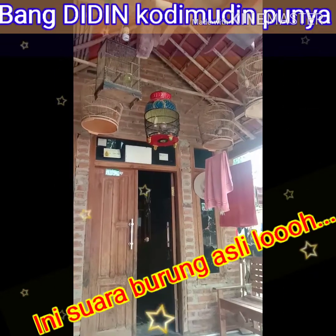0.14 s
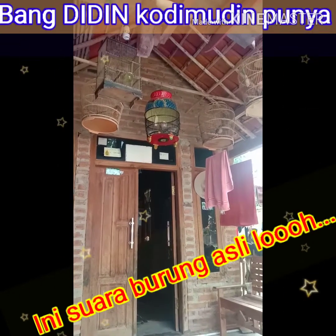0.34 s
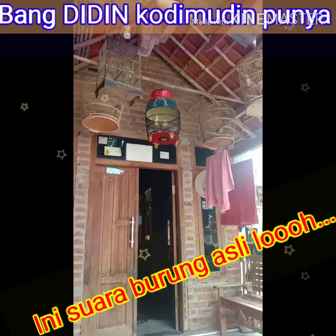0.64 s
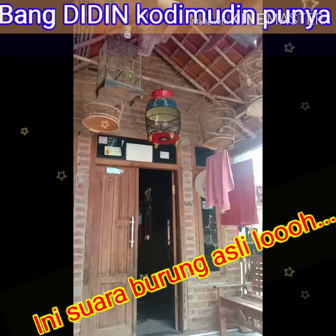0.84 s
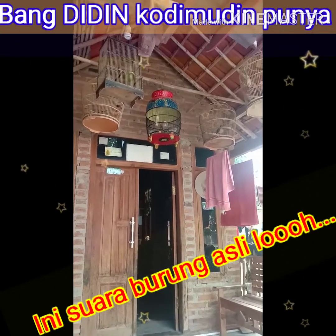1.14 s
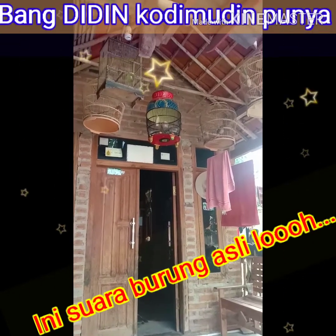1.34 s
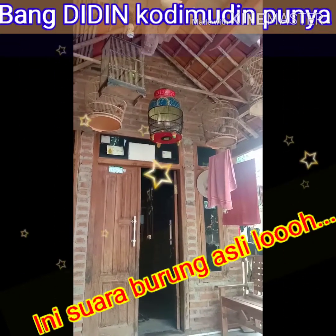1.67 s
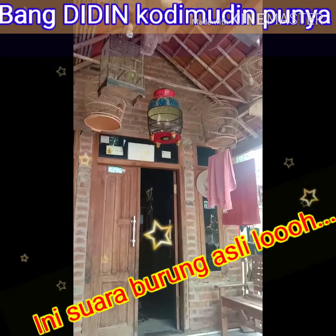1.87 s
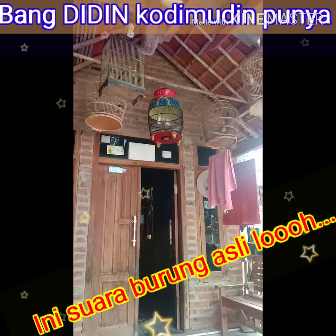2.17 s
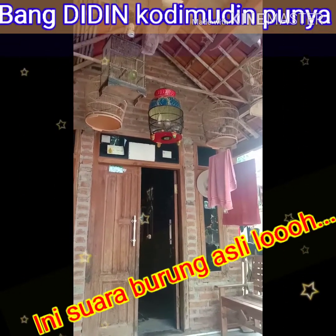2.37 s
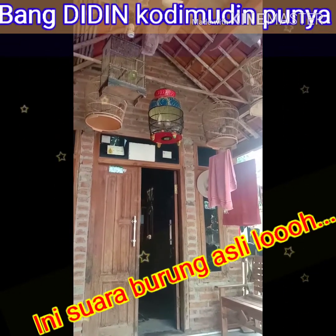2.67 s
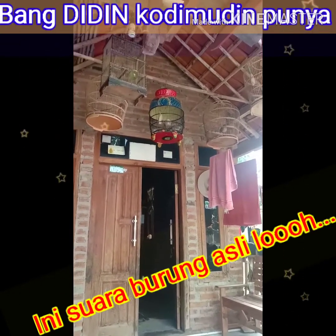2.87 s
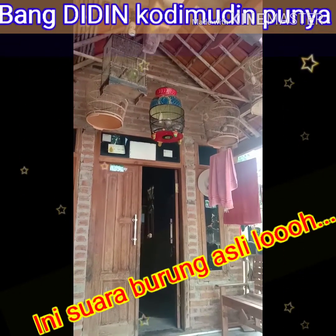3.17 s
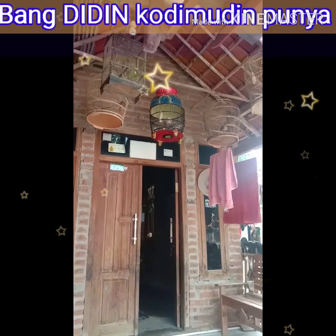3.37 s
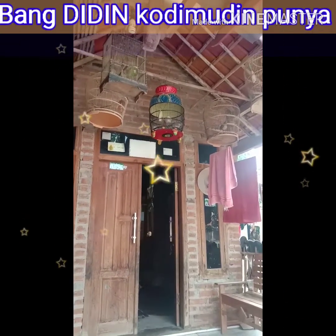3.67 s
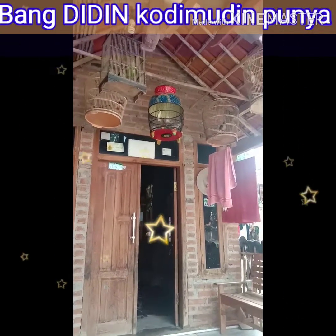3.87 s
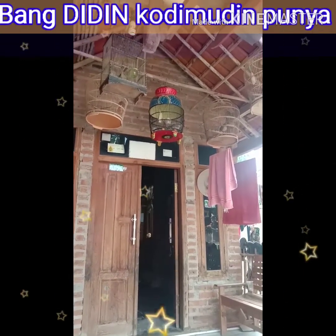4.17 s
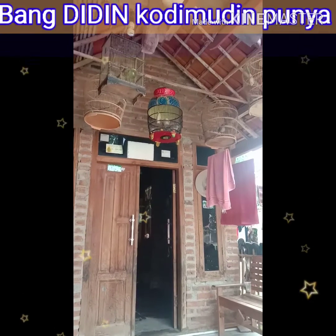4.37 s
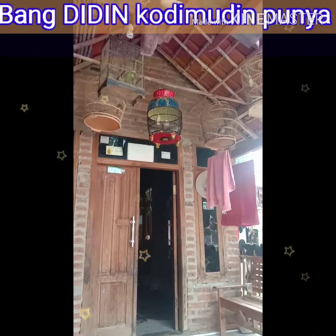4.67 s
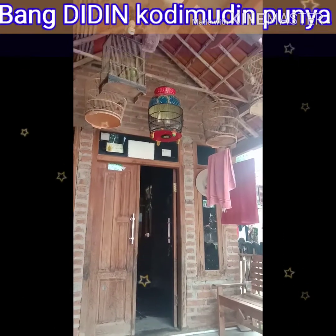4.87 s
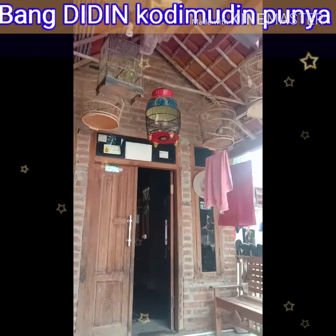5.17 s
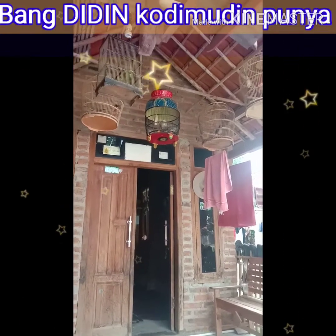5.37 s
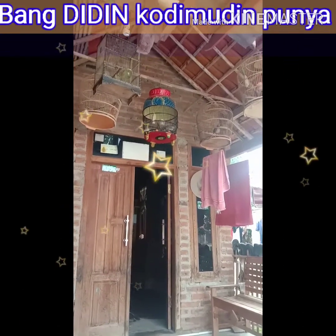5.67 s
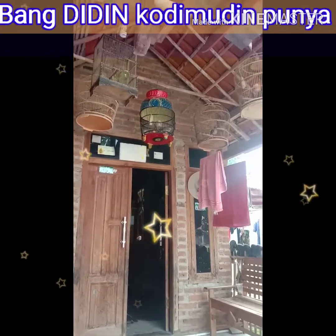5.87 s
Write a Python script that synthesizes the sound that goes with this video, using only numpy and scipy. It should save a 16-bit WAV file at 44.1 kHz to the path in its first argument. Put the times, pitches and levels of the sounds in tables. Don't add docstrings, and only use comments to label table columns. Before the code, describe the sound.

On a hard-walled house porch, one dove dominates with three clear, flute-like calls of long, short, short, short, longer, long notes. A second dove replies softly and reverberantly after the first call. Small birds twitter far off, hens cluck quietly, and a broom brushes the ground around three seconds and twice near the second half's middle. Distant traffic swells gently beneath light open-air noise and faint motor hum.

```python
import sys
import numpy as np
from scipy import signal
from scipy.fft import rfft, irfft, next_fast_len
from scipy.io import wavfile
from scipy.ndimage import uniform_filter1d

SR = 44100
rng = np.random.default_rng(int(sys.argv[2]) if len(sys.argv) > 2 else 0)


def inscribe(sig):
    pcm = np.round(np.clip(np.atleast_2d(sig).T, -1, 1) * 32767)
    wavfile.write(sys.argv[1], SR, pcm.astype(np.int16))


def rack_gain(trim_db):
    fader = np.asarray(trim_db, float)
    return 10 ** (fader / 20)


N = 265909
LEAD = SR // 2

# length_s, start_hz, top_hz, end_hz, level_db
CALL_NOTES = [
    (0.1150, 700.0, 1252.0, 1220.0, -18.1),
    (0.0276, 1046.0, 1235.0, 1223.0, -16.0),
    (0.0291, 988.0, 1229.0, 1217.0, -17.8),
    (0.0322, 721.0, 1238.0, 1158.0, -20.2),
    (0.0408, 635.0, 1274.0, 1229.0, -18.7),
    (0.1162, 709.0, 1293.0, 1194.0, -16.8),
]
NOTE_ONSETS = (0, .1177, .1586, .2172, .3001, .4008)
# first_note_s, rhythm_stretch
CALLS = [
    (-.1825, 1.018),
    (2.4186, 1.0),
    (5.1073, 1.0185),
]
# multiple, level_db (re tone)
OVERTONES = [(2, -56), (3, -65), (4, -67), (5, -52), (6, -69.5), (7, -68.5)]
# start_s, length_s, start_hz, top_hz, level_db
ANSWER_OPENING = [
    (1.031, 0.024, 1270, 1300, -52.5),
    (1.056, 0.053, 875, 1098, -46.5),
    (1.093, .105, 1260, 1263, -33),
]
# start_s, length_s, top_hz, level_db
ANSWER_RUN = [
    (1.212, 0.032, 1192, -46.5),
    (1.274, 0.044, 1210, -46),
    (1.326, 0.04, 1088, -51.5),
    (1.402, 0.029, 1214, -43),
    (1.481, 0.028, 1280, -39.5),
    (1.561, .032, 1285, -41),
    (1.66, .045, 1257, -39.5),
    (1.797, .075, 1228, -42.5),
    (1.883, 0.022, 1236, -46.5),
]
# start_s, length_s, start_hz, level_db
SPARROWS = [
    (.48, .09, 4800, -64.5),
    (1.52, .07, 4790, -67.5),
    (2.04, .07, 5280, -70),
    (2.77, 0.051, 4340, -51.5),
    (4.14, .07, 5000, -67),
    (4.70, .05, 5140, -68.5),
    (5.69, .08, 5400, -72.5),
]
# start_s, length_s, start_hz, level_db
FINCHES = [(.08, 0.075, 3006, -69), (.125, 0.045, 3780, -64.5), (.545, 0.061, 3190, -68),
           (.99, .09, 3160, -69), (1.00, 0.074, 3780, -73), (1.68, 0.093, 2157, -66),
           (1.74, 0.14, 2600, -61.5), (1.86, 0.15, 2500, -64.5), (1.75, .2, 3100, -66.5),
           (1.86, 0.066, 3830, -68.5), (2.27, 0.12, 3140, -65), (2.27, 0.11, 3760, -71.5),
           (3.0, 0.17, 3476, -61), (3.16, .2, 3740, -64), (3.235, 0.042, 7580, -65.5),
           (3.13, 0.15, 7780, -74.5), (3.40, 0.057, 2020, -64), (5.01, 0.096, 5380, -63.5),
           (5.86, .07, 3007, -70.5), (5.85, 0.11, 5920, -73), (5.91, .08, 7180, -76.5),
           (5.98, 0.037, 2640, -66.5)]
# start_s, length_s, start_hz, level_db
HENS = [
    (1.54, 0.022, 737, -59),
    (1.9, 0.19, 800, -66.5),
    (2.2, 0.19, 726, -65.5),
    (2.99, 0.069, 824, -60),
    (3.09, 0.19, 977, -53.5),
    (3.11, 0.077, 2140, -60),
    (3.22, 0.205, 685, -65),
    (4.60, 0.14, 851.6, -65.5),
    (5.89, .1, 780, -62),
    (5.07, 0.04, 910, -48.5),
]
# start_s, length_s, start_hz, level_db
WHISTLERS = [(.55, 0.11, 724.5, -64), (1.22, 0.18, 733, -66), (1.585, 0.052, 6960, -66),
             (2.5, 0.57, 3602, -73), (2.78, 0.063, 2100, -67.5), (1.52, 0.11, 1661, -69),
             (3.04, 0.043, 2370, -55), (3.04, 0.048, 1180, -35), (3.16, 0.044, 1240, -52),
             (3.23, 0.12, 2096, -68.5), (3.30, 0.08, 1181, -60.5), (3.35, 0.29, 3660, -79.5),
             (3.50, .11, 1133, -59), (3.61, .04, 3000, -66), (3.67, 0.086, 3174, -66.5),
             (4.00, 0.084, 2663, -64), (4.08, 0.11, 2660, -60.5), (4.00, 0.075, 1130, -63.5),
             (4.42, 0.052, 1270, -64.5), (4.48, 0.19, 1660, -67), (4.80, 0.075, 1276, -67),
             (5.00, .05, 1192, -60.5), (5.8, .2, 903, -64), (.18, 0.044, 781, -58)]
# touch_s, hardest_s, level_db, touch_hz, lift_hz (hiss centre)
STROKES = [
    (2.95, 2.969, -52, 5885, 4600),
    (4.533, 4.621, -55.5, 4750, 4810),
    (4.953, 5.046, -57, 4360, 5730),
]
# delay_s, level_db
ECHOES = [(0.0049, -4.8), (0.01569, -6.0), (0.01779, -5.5), (0.03018, -6.0), (0.03382, -11.7),
          (0.04266, -26.6), (0.05237, -21.1), (0.05768, -15.1), (0.0659, -20.9), (0.07047, -19.9),
          (0.08321, -24.6), (0.08942, -23.4)]
# freq_hz, density_db_per_hz
RUMBLE_SPECTRUM = [(15, -52.5), (25, -22.5), (32, -21), (43, -16), (62, -8), (75, 1), (134, 1.5),
                   (158, 0.5), (197, -13), (226, -11), (259, -20), (300, -10.5), (323, -17.5), (389, -28),
                   (480, -35.5), (620, -58), (1060, -120)]
# peak_s, spread_s, gain_db
SURGES = [(.12, .05, 7.5), (.34, .06, 2.5), (0.701, 0.17, 2), (1.5, 0.16, 3.5), (1.9, 0.14, 8),
          (2.22, 0.0494, 8), (2.7, 0.27, 8), (3.081, .05, 10), (3.35, .1, 7), (4.0, 0.18, 5.5),
          (4.55, 0.19, 7), (5.05, 0.19, 7), (5.5, 0.24, 5.5)]
# freq_hz, density_db_per_hz
AIR_SPECTRUM = [(240, -32.5), (400, -6.5), (473, -7), (926, -8), (1240, -1), (1490, -12), (2820, -15.5),
                (3710, -15.5), (5270, -22.5), (5950, -19), (6620, -22.5), (7370, -20), (8720, -29.5),
                (12400, -29.5), (15300, -26.5)]
# freq_hz, width_hz, level_db
HUM_LINES = [
    (217.4, 14, -84),
    (298, 15, -72),
    (1631, 82, -84.5),
]


def rms_one(x):
    return x / np.sqrt(np.mean(x ** 2) + 1e-20)


def drift(rate_hz, size=N):
    step = 20
    pole = np.exp(-2 * np.pi * rate_hz * step / SR)
    noise = rng.standard_normal(size // step + 2002)
    slow = signal.lfilter([1], [1, -2 * pole, pole ** 2], noise)[2000:]
    return np.interp(np.arange(size) / step, np.arange(len(slow)), rms_one(slow))


def add(track, start_s, sound):
    at = LEAD + round(start_s * SR)
    track[at:at + len(sound)] += sound[:len(track) - at]


def convolve(track, response):
    return signal.fftconvolve(track, response)[LEAD:LEAD + N]


def diffuse(t60_s, build_s):
    t = np.arange(SR) / SR
    build_up = 1 - np.exp(-(t / build_s) ** 2)
    tail = rng.standard_normal(SR) * rack_gain(-60 * t / t60_s) * build_up
    return tail / np.sqrt(np.sum(tail ** 2))


def porch(echo_db, wet_db, build_s):
    porch_tail = rack_gain(-20 + wet_db) * diffuse(0.25, build_s)
    yard_tail = rack_gain(-27.5 + wet_db) * diffuse(0.83, build_s)
    response = porch_tail + yard_tail
    response[0] = 1
    for delay_s, level_db in ECHOES:
        whole, part = divmod(delay_s * SR, 1)
        at = int(whole)
        response[at:at + 2] += rack_gain(level_db + echo_db) * np.array([1 - part, part])
    return response


def banded_noise(spectrum, patchy_db, rate_hz):
    size = next_fast_len(N)
    spectrum_hz, spectrum_db = np.array(spectrum).T
    hz = np.maximum(np.fft.rfftfreq(size, 1 / SR), 1)
    gain = rack_gain(np.interp(np.log(hz), np.log(spectrum_hz), spectrum_db))
    shaped = rfft(rng.standard_normal(size)) * gain
    together = drift(4.0)
    out = 0
    for centre_octave in np.arange(4, 15):
        share = np.clip(1 - np.abs(np.log2(hz) - centre_octave), 0, 1)
        band = irfft(shaped * share, size)[:N]
        out = out + band * rack_gain(patchy_db * (0.62 * together + drift(rate_hz)))
    return rms_one(out)


def whistle(length_s, start_hz, end_hz, level_db, wobble):
    share = np.linspace(0, 1, round(length_s * SR))
    hz = (start_hz + (end_hz - start_hz) * share) * (1 + wobble[:len(share)])
    return rack_gain(level_db) * np.sin(np.pi * share) ** 0.6 * np.sin(2 * np.pi * np.cumsum(hz) / SR)


def coo(length_s, start_hz, top_hz, end_hz, rise_s, level_db, swell_rises=3.39, overtones=OVERTONES):
    close_s, total_s = 0.0116, length_s + 0.004
    t = np.arange(round(total_s * SR)) / SR
    sag_hz = (end_hz - top_hz) * t / length_s
    swoop_hz = (start_hz - top_hz) * np.exp(-t / rise_s)
    droop_hz = -33 * np.exp((t - length_s) / close_s)
    phase = 2 * np.pi * np.cumsum(top_hz + sag_hz + swoop_hz + droop_hz) / SR
    swell = np.sin(np.pi / 2 * np.clip(t / (swell_rises * rise_s), 0, 1)) ** 2
    fade = np.sin(np.pi / 2 * np.clip((total_s - t) / (1.5 * close_s), 0, 1)) ** 2
    effort = swell ** 3 * rack_gain(level_db + 16.5)
    upper = 0
    for k, overtone_db in overtones:
        uneven_db = 12 * np.sin(k * k + 70 * k * t)
        upper = upper + rack_gain(overtone_db - 5 + uneven_db) * np.sin(k * phase)
    return rack_gain(level_db) * (np.sin(phase) + effort * upper) * swell * fade


def near_dove():
    intake_lead_s, sigh_s = 0.034, 0.47
    track = np.zeros(LEAD + N)
    for first_s, stretch in CALLS:
        intake = whistle(0.043, 1320, 960, -34.5, 0.08 * drift(140, size=SR))
        sigh = whistle(0.064, 1180, 1060, -32.5, 0.022 * drift(67, size=SR))
        add(track, first_s - intake_lead_s, intake)
        add(track, first_s + stretch * sigh_s, sigh)
        for onset_s, (length_s, start_hz, top_hz, end_hz, level_db) in zip(NOTE_ONSETS, CALL_NOTES):
            rise_s = 0.0027 + 0.063 * onset_s ** 2
            note = coo(length_s, start_hz, top_hz, end_hz, rise_s, level_db)
            add(track, first_s + stretch * onset_s, note)
    return convolve(track, porch(echo_db=0.5, wet_db=-1.0, build_s=0.072))


def traffic_rumble():
    t = np.arange(N) / SR
    level_db = -56.5
    for peak_s, spread_s, gain_db in SURGES:
        level_db = level_db + gain_db * np.exp(-((t - peak_s) / spread_s) ** 2)
    return rack_gain(level_db) * banded_noise(RUMBLE_SPECTRUM, patchy_db=2.0, rate_hz=3.9)


def yard_air():
    return rack_gain(-70.5) * banded_noise(AIR_SPECTRUM, patchy_db=1.66, rate_hz=14)


def motor_hum():
    out = 0
    for freq_hz, width_hz, level_db in HUM_LINES:
        r = np.exp(-np.pi * width_hz / SR)
        poles = [1, -2 * r * np.cos(2 * np.pi * freq_hz / SR), r * r]
        line = signal.lfilter([1, 0, -1], poles, rng.standard_normal(N))
        out = out + rack_gain(level_db) * rms_one(line)
    return out


def bird_calls(rows, glide, wobble_hz):
    return [(start_s, length_s, start_hz, glide * start_hz, level_db, wobble_hz)
            for start_s, length_s, start_hz, level_db in rows]


def twitter():
    when, pitch, length, rise, faint = rng.random((170, 5)).T
    start_hz = 750 * 10.0 ** pitch
    end_hz = start_hz * (1 + 0.14 * rise)
    level_db = -73 - 8 * faint - 5 * np.log2(start_hz / 2000)
    return zip(6.0 * when, 0.02 + 0.1 * length, start_hz, end_hz, level_db, 0.048 * start_hz * faint)


def yard_birds():
    calls = [*bird_calls(SPARROWS, 0.81, 200),
             *bird_calls(FINCHES, 0.97, 150),
             *bird_calls(HENS, 0.84, 92),
             *bird_calls(WHISTLERS, 0.96, 14),
             *twitter()]
    track = np.zeros(LEAD + N)
    wander = drift(160, size=N + SR)
    for start_s, length_s, start_hz, end_hz, level_db, wobble_hz in calls:
        wobble = wobble_hz / start_hz * wander[round(start_s * SR):]
        add(track, start_s, whistle(length_s, start_hz, end_hz, level_db - 1.5, wobble))
    return convolve(track, porch(echo_db=-7.5, wet_db=11, build_s=0.025))


def far_dove():
    run_start_hz, sag = 824, 0.93
    run = [(start_s, length_s, run_start_hz, top_hz, level_db)
           for start_s, length_s, top_hz, level_db in ANSWER_RUN]
    track = np.zeros(LEAD + N)
    for start_s, length_s, start_hz, top_hz, level_db in [*ANSWER_OPENING, *run]:
        note = coo(length_s, start_hz, top_hz, sag * top_hz, 0.010, level_db, swell_rises=1.2, overtones=[])
        add(track, start_s, note)
    return convolve(track, porch(echo_db=-9, wet_db=14.5, build_s=0.03))


def broom():
    land_s, ease_s, lift_s, press_hz = 0.04, 0.096, 0.18, 5750
    hz, t, frames = signal.stft(rng.standard_normal(N), SR, nperseg=512)
    shape = np.zeros(frames.shape)
    for touch_s, hardest_s, peak_db, touch_hz, lift_hz in STROKES:
        times_s = [touch_s - land_s, touch_s, hardest_s,
                   hardest_s + ease_s, hardest_s + lift_s, hardest_s + 2 * lift_s]
        levels_db = peak_db + np.array([-30, -10, 0, -14.5, -22.5, -40])
        level_db = np.interp(t, times_s, levels_db, left=-150, right=-150)
        centre_hz = np.interp(t, times_s[1:5], [touch_hz, press_hz, press_hz, lift_hz])
        octaves = np.log2(np.maximum(hz, 1)[:, None] / (1.037 * centre_hz))
        slope_db = np.where(octaves > 0, -32 * octaves - 15 * octaves ** 2, 19 * octaves)
        shape += rack_gain(slope_db + level_db + 10.5)
    streaks = 2.6 * uniform_filter1d(rng.standard_normal(shape.shape), 9, axis=1)
    shape *= rack_gain(3.5 * streaks)
    return signal.istft(frames * shape, SR, nperseg=512)[1][:N]


def scene():
    background = traffic_rumble() + yard_air() + motor_hum()
    return (near_dove() + background + yard_birds() + far_dove() + broom())[None]


def roll_off(x):
    return signal.sosfilt(signal.butter(12, 15480, fs=SR, output="sos"), x)


def record(dry):
    bass_cut = signal.butter(2, 66, "high", fs=SR, output="sos")
    presence = signal.butter(2, 3000, "high", fs=SR, output="sos")
    dip = signal.butter(1, [6350, 6950], "band", fs=SR, output="sos")
    thin = signal.sosfilt(bass_cut, dry) + 0.056 * dry
    bright = thin + 0.27 * signal.sosfilt(presence, thin)
    dipped = bright - 0.5 * signal.sosfilt(dip, bright)
    return roll_off(dipped)


dry = scene()
out = record(dry)
inscribe(out)
```